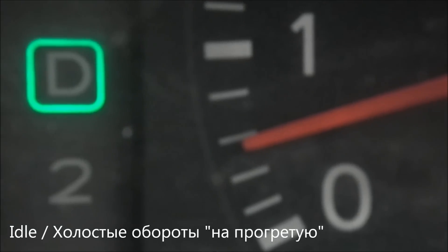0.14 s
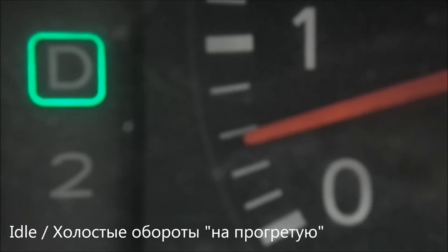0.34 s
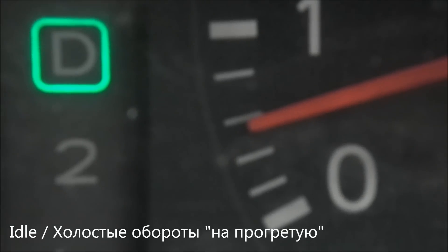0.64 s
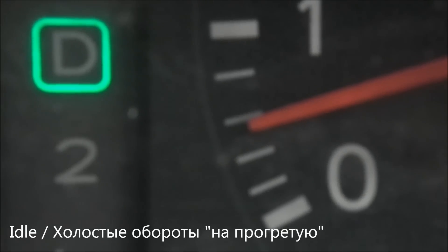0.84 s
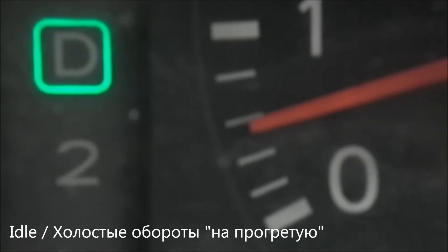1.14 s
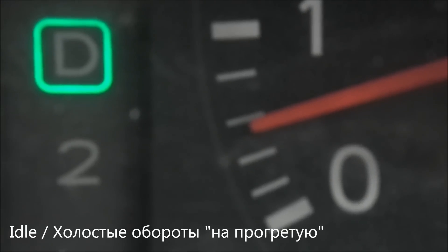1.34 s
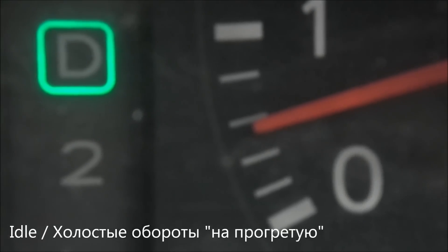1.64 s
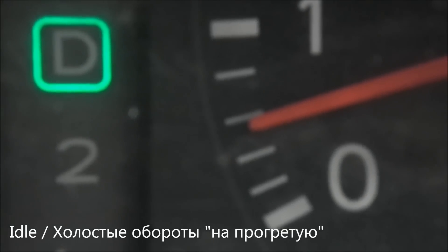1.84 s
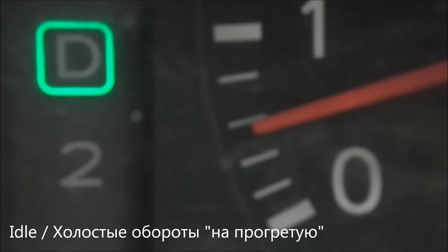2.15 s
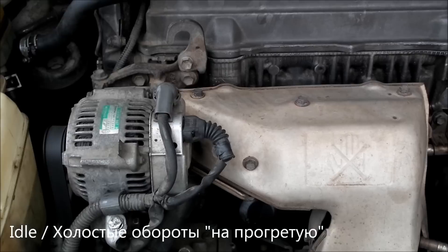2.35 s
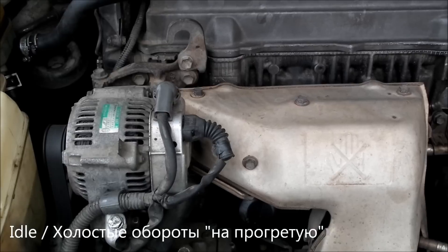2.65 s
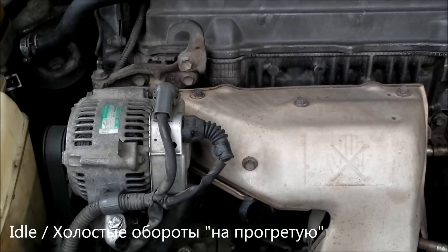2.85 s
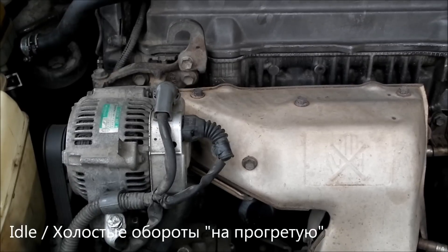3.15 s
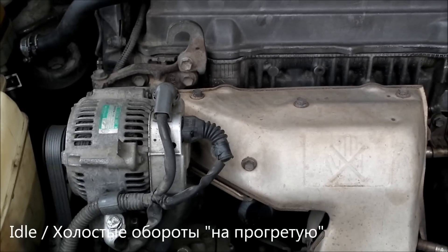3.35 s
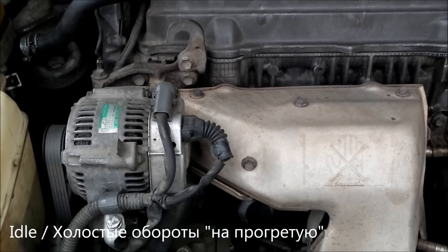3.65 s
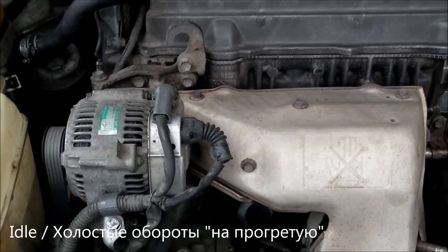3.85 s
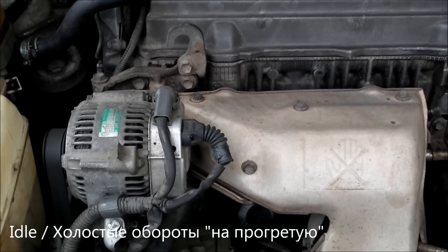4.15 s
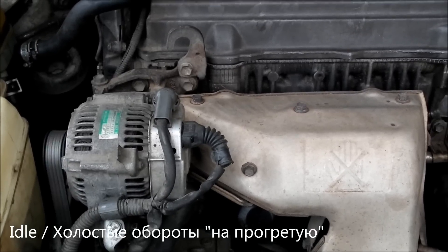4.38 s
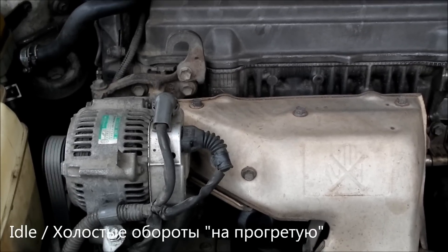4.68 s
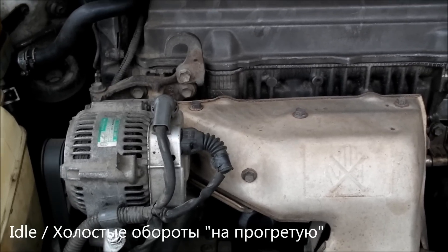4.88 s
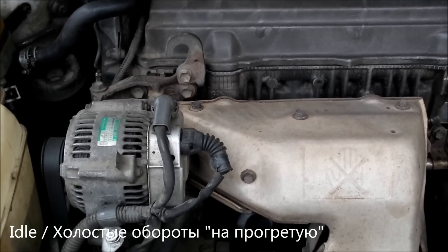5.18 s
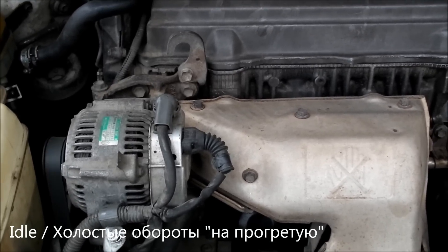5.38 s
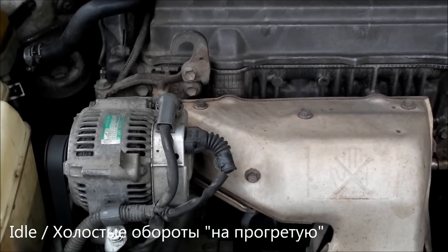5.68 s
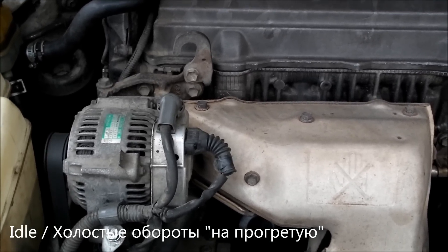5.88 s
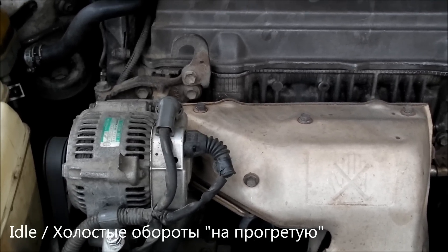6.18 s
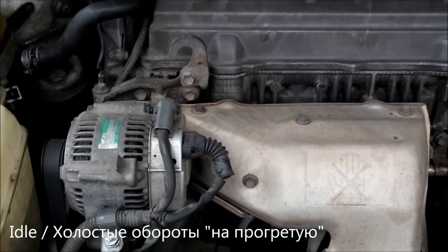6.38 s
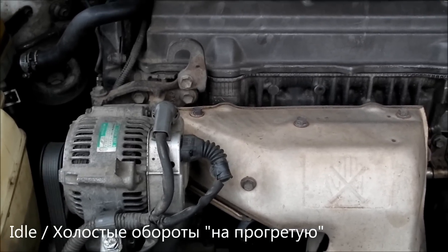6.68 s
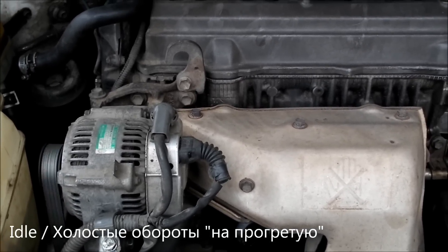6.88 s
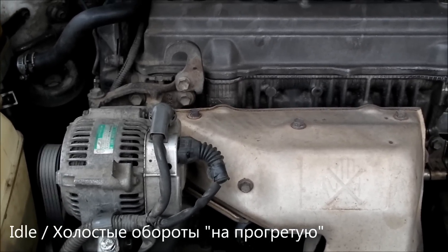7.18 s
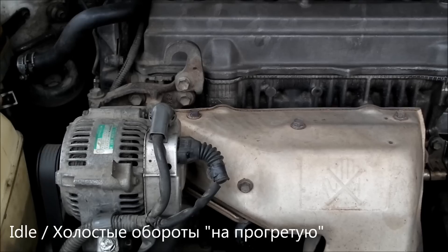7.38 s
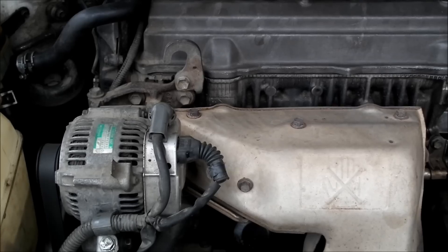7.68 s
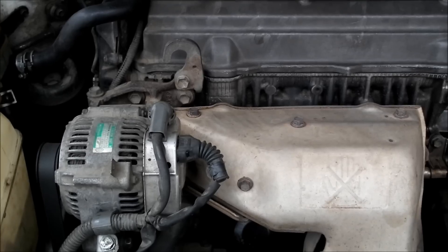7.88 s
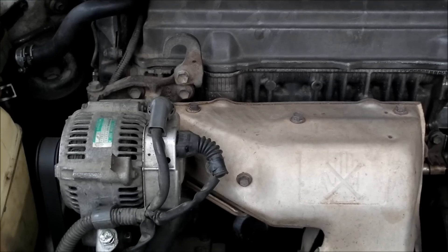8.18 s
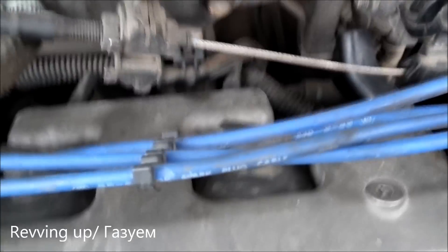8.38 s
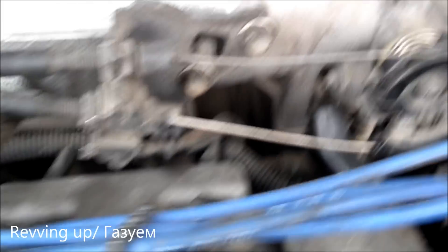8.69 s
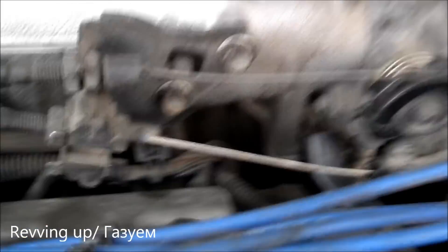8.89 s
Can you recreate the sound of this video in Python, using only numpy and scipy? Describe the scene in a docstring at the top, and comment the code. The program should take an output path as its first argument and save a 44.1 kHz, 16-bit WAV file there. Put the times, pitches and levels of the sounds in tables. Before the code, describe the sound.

From 0 to 2.3 seconds, a warm four-cylinder engine idles in gear, heard inside the car: a dull, slow, low throb with muffled tones and smooth faint hiss. Very faint, brief high pips recur about every 0.3 seconds; small clicks fall near 0.5, 0.8, 1.6 and 1.8, the one at 1.6 sharpest. A tiny near-silent gap follows. At about 2.36 a hard cut opens the engine bay, close and much brighter: dense metallic valve clatter and paired injector ticks repeat around six times a second over whirring belts and a softly rounded firing beat. The idle wavers slightly. Low rough hums creep upward from 2.4, around 5 and near 8, with a thin steady whine and slight draught. At 8.5 another cut goes close to the throttle: harder, crackling knocks over an even whirr, stronger low air flutter and continuing whine until 9.0, with no rise in engine speed.

```python
"""A warm four-cylinder petrol engine idles, heard from three places in turn, joined by hard cuts.
First the cabin: a dull throb of low noise and crank-locked tones, with small clicks and faint high pips.
After a near-silent moment, the open engine bay: dense clatter on a soft beat, with hums, whine and draught.
Last, close by the throttle, hard knocks stand over a steady whirr as the whine and draught go on.
In bay and throttle, each camshaft turn repeats valve-train knocks and two injector ticks, as noise bursts."""
import sys
import numpy as np
from scipy import signal
from scipy.fft import rfft, irfft, next_fast_len
from scipy.io import wavfile
from scipy.ndimage import uniform_filter1d

SR = 44100
rng = np.random.default_rng(int(sys.argv[2]) if len(sys.argv) > 2 else 0)


def master_out(mix):
    """Clip the mix to full scale and print it as 16-bit PCM to the path in sys.argv[1]."""
    frames = np.transpose(np.atleast_2d(mix))
    ceiling = np.clip(frames, -1, 1)
    pcm = np.round(ceiling * 32767).astype(np.int16)
    wavfile.write(sys.argv[1], SR, pcm)


N = 398223


def from_db(db):
    """Decibels to a gain."""
    return 10 ** (np.asarray(db) / 20)


def curve(rows, at, axis=1):
    """Straight lines between the rows of a table."""
    rows = np.array(rows, float)
    return np.interp(at, rows[:, 0], rows[:, axis])


def at_hz(points, hz):
    """Straight lines between the points of a table, on a logarithmic frequency scale."""
    points = np.array(points, float)
    return np.interp(np.log(hz + 1), np.log(points[:, 0]), points[:, 1])


def panned(db):
    """Left and right gains for a level difference."""
    return from_db(np.array([[.5], [-.5]]) * db)


def butter(x, hz, kind):
    """Gentle second-order low, high or band filter."""
    edges = np.clip(hz, 10, .45 * SR)
    return signal.sosfilt(signal.butter(2, edges, kind, fs=SR, output="sos"), x)


def colour(x, spectrum, resonances, tilt_db=0, size=4096):
    """Causal filter made of a broad spectrum, resonances and a tilt; without a spectrum it starts flat."""
    hz = np.fft.rfftfreq(size, 1 / SR)
    db = at_hz(spectrum, hz) + 10 * np.log10(SR / 2) if spectrum else 0
    db = db + tilt_db * np.log2(np.maximum(hz, 250) / 2300)
    db = db + sum(gain / (1 + (2 * (hz - centre) / width) ** 2) for centre, width, gain in resonances)
    # folding the cepstrum forward gives minimum phase: nothing sounds before its cause
    cepstrum = irfft(np.log(from_db(db)))
    cepstrum[1:size // 2] *= 2
    cepstrum[size // 2 + 1:] = 0
    response = irfft(np.exp(rfft(cepstrum)))
    return signal.oaconvolve(x, response[None], axes=1)[:, :x.shape[1]]


def swell(t, start, end, fade_s):
    """Fade in, hold, fade out."""
    return np.clip(np.minimum(t - start, end - t) / fade_s, 0, 1)


# moving air on the microphone ports, before its level curve: (frequency [Hz], density [dB per Hz])
DRAUGHT_SPECTRUM = [(30, -73), (90, -72.5), (200, -75), (400, -78), (1000, -105)]
# how strongly the air moves: (time [s], gain [dB])
DRAUGHT_GAIN = [(2.4, -4), (8.3, -33), (8.6, 17), (9.0, 7)]


def draught(t):
    """A low flutter of turbulent air, different in each port."""
    air = colour(rng.standard_normal((2, len(t))), DRAUGHT_SPECTRUM, [])
    return from_db(curve(DRAUGHT_GAIN, t)) * air


# low hums that creep up in pitch: (start [s], end [s], pitch at start [Hz], rise [Hz per s],
# level [dB rms], roughness [0-1])
HUM_SWELLS = [(2.209, 4.398, 102.2, 15, -39.5, 0.85), (2.304, 5.1, 65.8, 9.5, -46.5, 0.5),
              (4.991, 6.7, 77, 4, -42, .4), (7.704, 8.75, 126, 8.5, -39.5, 0.5)]


def hum(t, fade_s=0.2, wander_hz=13):
    """Each swell is a slowly rising tone, part clean and part a narrow band of noise."""
    out = 0
    for start, end, hz, rise_hz_per_s, db, rough in HUM_SWELLS:
        rough = np.clip(rough, 0, 1)
        wander = butter(rng.standard_normal((2, len(t))), wander_hz, "low")
        phase = 2 * np.pi * np.cumsum(hz + rise_hz_per_s * (t - start)) / SR
        noisy = (wander[0] * np.cos(phase) + wander[1] * np.sin(phase)) / wander.std()
        clean = np.sqrt(2 * (1 - rough ** 2)) * np.sin(phase)
        out = out + from_db(db) * swell(t, start, end, fade_s) * (rough * noisy + clean)
    return out


# a thin whine, perhaps an electric motor: (start [s], end [s], level [dB rms])
WHINE_SPELLS = [(2.2, 4.2, -52), (4.4, 7.8, -42), (8.4, 9.1, -39)]


def whine(t, hz=487.4, fade_s=0.14, octave_db=-40.5):
    """A tone of fixed pitch that comes and goes under its steady octave."""
    phase = 2 * np.pi * hz * t
    level = sum(from_db(db) * swell(t, start, end, fade_s) for start, end, db in WHINE_SPELLS)
    return np.sqrt(2) * (level * np.sin(phase) + from_db(octave_db) * np.sin(2 * phase))


def pips(t, hz=10560, db=-50, first_s=.0935, every_s=.2843, length_s=.018):
    """A faint, very high sine is gated on briefly at an even pace, with softened edges."""
    is_on = (t - first_s) % every_s < length_s
    gate = uniform_filter1d(1. * is_on, size=130)
    return from_db(db) * gate * np.sin(2 * np.pi * hz * t)


# small clicks and rubs in the cabin: (time [s], level before envelope and pan [dB], centre [Hz],
# width [octaves], rise [ms], decay [ms])
CABIN_CLICKS = [(0.02, -49.5, 2400, 1.1, 40, 380), (0.477, -30.5, 2100, 1.54, 2.2, 11.6),
                (.8041, -45, 4500, 2.2, .5, 6), (1.465, -37, 2750, .45, 37, 35),
                (1.558, -15.5, 2620, 0.46, 0.34, 1.9), (1.559, -35.5, 2300, 2.2, .5, 5.5),
                (1.844, -26.5, 2560, 0.53, .5, 2.5)]


def cabin_clicks(t):
    """Short bursts of band-limited noise, each rising and dying away."""
    out = 0
    for start, db, hz, octaves, rise_ms, decay_ms in CABIN_CLICKS:
        ms = np.maximum(t - start, 0) * 1000
        envelope = (1 - np.exp(-ms / rise_ms)) * np.exp(-ms / decay_ms)
        burst = rng.standard_normal((2, len(t))) * envelope
        edges = hz * 2 ** (np.array([-.5, .5]) * octaves)
        even_power = np.sqrt(SR / 2 / np.ptp(edges))   # narrow bands as strong as wide ones
        out = out + from_db(db) * even_power * butter(burst + 1e-18, edges, "band")
    return out * panned(-1.5)


def cam_turns(span, idle_rpm, tick_s, surges=(), surge_s=.768):
    """Times of a span, and the camshaft's angle in turns from tick_s: one turn for two of the crank."""
    t = np.arange(int(span[0] * SR), min(int(span[1] * SR), N)) / SR
    hunting = sum(extra * np.exp(-((t - s) / surge_s) ** 2) for s, extra in surges)
    rpm = np.full(len(t), idle_rpm) + hunting
    turns = np.cumsum(rpm) / (120 * SR)
    return t, turns - np.interp(tick_s, t, turns)


def even_turn(period, count=6):
    """White noise of one turn, smoothed octave by octave so that no spot of the turn sticks out."""
    spectrum = np.exp(2j * np.pi * rng.random((2, period))) * np.sqrt(period)
    hz = np.arange(period) * SR / period
    for low in (520, 1040, 2080):
        band = (hz >= low) & (hz < 2 * low)
        for _ in range(count):
            # flatten the envelope in time, then the spectrum, over and over
            steady = np.exp(1j * np.angle(np.fft.ifft(spectrum * band)))
            flat = np.exp(1j * np.angle(np.fft.fft(steady))) * np.sqrt(period)
            spectrum = np.where(band, flat, spectrum)
    return irfft(spectrum[:, :period // 2 + 1])


# what every turn has in common: (frequency [Hz], share of power alike on every turn [0-1])
REPEATED_SHARE = [(60, 0.8), (300, 0.6), (700, 0.84), (1300, 0.94), (2500, 0.36), (5000, 0.061),
                  (10000, 0.045)]
# stereo spread, before any widening and capped at 0 dB: (frequency [Hz], side against mid [dB])
STEREO_WIDTH = [(100, -30), (400, -15), (700, -18), (1000, -13.5), (1500, -9), (2300, -4), (4000, -1.5),
                (12000, 0.5)]


def engine_noise(turns, wider_db=0):
    """White stereo excitation: the same metal surfaces meet on every turn, so part of it repeats."""
    n, size = len(turns), next_fast_len(len(turns), real=True)
    period = 2 * int(n / (turns[-1] - turns[0]) / 2)
    locked = [np.interp(turns % 1 * period, np.arange(period), row) for row in even_turn(period)]
    hz = np.fft.rfftfreq(size, 1 / SR)
    share = np.clip(at_hz(REPEATED_SHARE, hz), 0, 1)
    width = from_db(np.minimum(at_hz(STEREO_WIDTH, hz) + wider_db, 0))
    fresh = rng.standard_normal((2, size))
    mid, side = np.sqrt(share) * rfft(locked, size) + np.sqrt(1 - share) * rfft(fresh)
    stereo = (mid + width * side * [[1], [-1]]) / np.sqrt(1 + width ** 2)
    return irfft(stereo, size)[:, :n]


def whirr(turns, spectrum, body, low_hz, wider_db=0):
    """The running noise of belts, gears and bearings, coloured by the body it rings in."""
    return butter(colour(engine_noise(turns, wider_db), spectrum, body), low_hz, "high")


# where the whirr sits in stereo: (frequency [Hz], left-right difference [dB])
WHIRR_SIDES = [(1000, 0.5), (1500, 3.5), (2300, -5.5), (4000, -1.5), (6500, 6), (13000, -0.5)]


def placed(x):
    """Different parts of the engine lie to different sides, so each frequency has its own pan."""
    size = next_fast_len(x.shape[1], real=True)
    gains = panned(at_hz(WHIRR_SIDES, np.fft.rfftfreq(size, 1 / SR)))
    return irfft(rfft(x, size) * gains, size)[:, :x.shape[1]]


def throb(turns, at, depth_db):
    """Four firings a camshaft turn swell and relax the noise."""
    return from_db(depth_db * np.cos(8 * np.pi * (turns - at)))


def orders(turns, table):
    """Sines locked to the crankshaft, at multiples of its speed."""
    out = 0
    for multiple, db in table:
        phase = 2 * np.pi * (2 * round(multiple) * turns + rng.random())
        out = out + np.sqrt(2) * from_db(db) * np.sin(phase)
    return out


def blows(turns, at, decay_ms, crack, spread_db, rise_ms=0.26):
    """Envelope of a contact made once a turn: a short crack and a decay, with a new strength each time."""
    count, since = np.divmod(turns - at, 1)
    ms = since * len(turns) / (turns[-1] - turns[0]) * 1000 / SR
    strengths = from_db(spread_db * rng.standard_normal(int(np.ptp(count)) + 1))
    strength = strengths[(count - count[0]).astype(int)]
    fall = np.exp(-ms / decay_ms) + crack * np.exp(-ms / 0.85)
    return strength * fall * (1 - np.exp(-ms / rise_ms))


# one injector tick before its strength and ring: (frequency [Hz], density [dB per Hz])
TICK_SPECTRUM = [(1500, -102), (3200, -62.5), (4200, -53.5), (6500, -49.5), (9000, -60.5), (12000, -69.5),
                 (15000, -74)]
# how the injector rings: (centre [Hz], width [Hz], boost [dB])
TICK_RING = [(13140, 1400, 16.5)]


def injectors(turns, first_db, second_db, decay_ms, pan_db):
    """The injectors fire in pairs, half a turn apart, as ringing bursts of fresh noise."""
    ticks = 0
    for at, db in ((0, first_db), (.5, second_db)):
        ticks = ticks + from_db(db) * blows(turns, at, decay_ms, crack=0.14, spread_db=1.8)
    bursts = rng.standard_normal((2, len(turns))) * ticks
    return panned(pan_db) * colour(bursts, TICK_SPECTRUM, TICK_RING)


def knocks_of_turn(contacts, cylinders, first_knock_turns=.1205):
    """Cylinders take even turns at the same contacts, with their own strength and hardness."""
    rows = []
    for k, (clack_db, knock_db, hard_db) in enumerate(cylinders):
        for j, (after, db, tilt_db, decay_ms, pan_db) in enumerate(contacts):
            at = first_knock_turns + k / len(cylinders) + after
            is_clack, is_knock = j == 0, j == 1   # any rebounds share the knock's strength
            own_db = clack_db if is_clack else knock_db
            rows.append((at, db + own_db, tilt_db + is_knock * hard_db, decay_ms, pan_db))
    return rows


# one knock before its strength, tilt and body: (frequency [Hz], density [dB per Hz])
KNOCK_SPECTRUM = [(100, -91.5), (250, -64.5), (450, -74), (700, -48.5), (1600, -49.5), (2300, -50),
                  (3200, -54), (4500, -62.5), (6500, -61), (10000, -77), (14000, -88)]


def valve_train(turns, knocks, body, crack, spread_db, size=300):
    """Each knock shakes the block with a burst of its own hardness."""
    noise, out = engine_noise(turns), 0
    for k, (at, db, tilt_db, decay_ms, pan_db) in enumerate(knocks):
        shifted = np.roll(noise, k * size, axis=1)   # a different stretch of noise for each contact
        burst = shifted * blows(turns, at, decay_ms, crack, spread_db)
        out = out + from_db(db) * panned(pan_db) * colour(burst, KNOCK_SPECTRUM, body, tilt_db)
    return out


# resonances of the cabin: (centre [Hz], width [Hz], boost [dB])
CABIN_RESONANCES = [(201, 14, 0), (373, 16, -6), (489, 90, 7.5), (516, 46, -11.5), (559, 7.7, 12),
                    (996, 130, 11)]
# whirr before resonances and trims: (frequency [Hz], density [dB per Hz])
CABIN_WHIRR_SPECTRUM = [(30.0, -67), (90.0, -57), (150.0, -65), (350.0, -66), (620.0, -67), (800.0, -81),
                        (1400.0, -84), (2500.0, -86.5), (4000.0, -88.5), (7000.0, -96), (10000.0, -100.0),
                        (14000.0, -104.0)]
# clean tones: (multiple of crank speed, level [dB rms])
CABIN_TONES = [(2, -42.5), (4, -43), (6, -50), (8, -47.5), (12, -54), (22, -50), (60, -47), (62, -47.5)]


def cabin():
    """Idling in gear: the firings throb through the bulkhead, while the faint hiss stays smooth."""
    t, turns = cam_turns(span=(0, 2.307), idle_rpm=557, tick_s=0)
    # sound reaches the cabin from all sides, so the noise is wider
    running = whirr(turns, CABIN_WHIRR_SPECTRUM, CABIN_RESONANCES, low_hz=71, wider_db=9)
    low = signal.sosfiltfilt(signal.butter(4, 850, fs=SR, output="sos"), running)
    hiss = from_db(0.4) * (running - low)
    throbbing = from_db(-0.64) * throb(turns, at=.19, depth_db=3.0) * low
    return hiss + throbbing + orders(turns, CABIN_TONES) + cabin_clicks(t) + pips(t)


# resonances of block and covers: (centre [Hz], width [Hz], boost [dB])
BAY_RESONANCES = [(266, 116, 8.4), (384, 15, 3.2), (596, 126, 4.5), (648.5, 99, 12.47), (764, 25.3, 12),
                  (834.6, 33, 11.6), (990, 46, 0.98), (1106, 58, 6.3), (1293, 37, 9.8), (2070, 19, 3.0),
                  (2315, 97, 5.2), (2450, 110, 1.5), (4160, 340, 6.2)]
# whirr before resonances, pan and trim: (frequency [Hz], density [dB per Hz])
BAY_WHIRR_SPECTRUM = [(30.0, -67), (90.0, -62), (250.0, -64), (450.0, -63), (700.0, -59.5), (1100.0, -55),
                      (1600.0, -57), (2300.0, -56), (3200.0, -61), (4500.0, -65), (6500.0, -59.5),
                      (10000.0, -67.5), (13500.0, -78.5)]
# clean tones: (multiple of crank speed, level [dB rms])
BAY_TONES = [(2, -55), (4, -51)]
# the idle hunts in smooth surges: (time of peak [s], extra speed [rpm])
IDLE_SURGES = [(3.827, 9.07), (5.872, 7.81), (8.101, 15.18)]
# leading clack, knock and rebounds, before cylinder strength and trim: (delay after knock [turns],
# level [dB], tilt [dB per octave], decay [ms], left-right difference [dB])
BAY_BLOWS = [(-.058, -1, 1.4, 10.1, 2), (0, 1.2, 4.5, 7.2, -1), (.025, -3, -1, 5.5, -1.5),
             (.072, -14.5, -4.5, 5.8, 4)]
# how the cylinders differ: (clack gain [dB], knock gain [dB], extra knock tilt [dB per octave])
BAY_CYLINDER_TRIMS = [(-13.5, 1, 0), (-12.5, -3, .5), (-0.5, 1, -2), (-1.5, 1.5, 1.5)]


def bay():
    """Over the alternator and the exhaust shield: a dense clatter on the rounded beat of the firings."""
    t, turns = cam_turns((2.357, 8.495), idle_rpm=723.93, tick_s=2.3655, surges=IDLE_SURGES)
    running = placed(whirr(turns, BAY_WHIRR_SPECTRUM, BAY_RESONANCES, low_hz=35.2))
    beat = (throb(turns, at=0.19, depth_db=2.5) - 1) * butter(running, 3800, "low")
    steady = from_db(-.5) * (running + beat) + orders(turns, BAY_TONES)
    knocks = valve_train(turns, knocks_of_turn(BAY_BLOWS, BAY_CYLINDER_TRIMS), BAY_RESONANCES,
                         crack=0.097, spread_db=1.05)
    knocks = from_db(-0.62) * panned(-2.0) * knocks
    ticks = injectors(turns, first_db=0.5, second_db=3.0, decay_ms=7.4, pan_db=1.0)
    return t, steady + knocks + ticks


# resonances of block and covers: (centre [Hz], width [Hz], boost [dB])
THROTTLE_RESONANCES = [(487, 23, 11), (605, 22, 12), (821.0, 58, 0), (963, 28, 8.5), (1110, 150, 12),
                       (1426, 31, 7.5), (2340, 100.0, 3), (2800, 166.0, 2)]
# whirr before resonances, pan and trim: (frequency [Hz], density [dB per Hz])
THROTTLE_WHIRR_SPECTRUM = [(30.0, -63.0), (90.0, -77), (250.0, -59), (450.0, -60), (700.0, -55.0),
                           (1100.0, -61), (1600.0, -63), (2300.0, -57), (3200.0, -64), (4500.0, -63),
                           (6500.0, -61.5), (10000.0, -68), (13500.0, -81)]
# leading clack and knock, before cylinder strength and trim: (delay after knock [turns],
# level [dB], tilt [dB per octave], decay [ms], left-right difference [dB])
THROTTLE_BLOWS = [(-.074, 0.5, 5, 5.5, -.5), (-.002, 4, -.5, 7.5, -0.041)]
# how the cylinders differ: (clack gain [dB], knock gain [dB], extra knock tilt [dB per octave])
THROTTLE_CYLINDER_TRIMS = [(1, -1.5, 1.5), (0, 3.5, 0.5), (0, 0.5, 0), (-15, -2.5, 5.5)]


def throttle():
    """By the valve cover: knocks with a strong crack stand out over an even whirr."""
    t, turns = cam_turns(span=(8.495, 9.04), idle_rpm=722, tick_s=8.5597)
    running = whirr(turns, THROTTLE_WHIRR_SPECTRUM, THROTTLE_RESONANCES, low_hz=35)
    steady = from_db(-0.46) * placed(running)
    knocks = valve_train(turns, knocks_of_turn(THROTTLE_BLOWS, THROTTLE_CYLINDER_TRIMS),
                         THROTTLE_RESONANCES, crack=0.92, spread_db=1.4)
    ticks = injectors(turns, first_db=5.5, second_db=3.5, decay_ms=4.4, pan_db=3.5)
    return t, steady + from_db(-1.5) * knocks + ticks


# the microphone shifts, and the engine's treble moves: (time [s], left-right difference [dB])
TREBLE_SIDES = [(2.4, 1.5), (4.6, 1), (5.2, -0.5), (8.4, -1), (8.6, 0.5)]


def scene():
    """The three places one after the other, with a near-silent moment after the cabin."""
    inside, (t_bay, front), (t_throttle, top) = cabin(), bay(), throttle()
    t, outside = np.r_[t_bay, t_throttle], np.hstack([front, top])
    treble = outside - butter(outside, 2400, "low")
    outside = outside + (panned(curve(TREBLE_SIDES, t)) - 1) * treble
    outside = outside + hum(t) + whine(t) + draught(t)
    pause = from_db(-66) * rng.standard_normal((2, N - inside.shape[1] - len(t)))
    return np.hstack([inside, pause, outside])


# narrow treble dips of the microphone: (centre [Hz], width [Hz], gain [dB])
MICROPHONE_DIPS = [(7930, 198, -53), (8814, 600, -23.5), (11750, 270, -62)]


def record(dry):
    """The microphone has three narrow dips in the treble; peaks are held at full scale and the top is cut."""
    heard = np.clip(colour(dry, None, MICROPHONE_DIPS), -1, 1)
    top_cut = signal.ellip(10, .1, 90, 15400, fs=SR, output="sos")   # ripple dB, depth dB, edge Hz
    return signal.sosfilt(top_cut, heard)


dry = scene()
out = record(dry)
master_out(out)
```